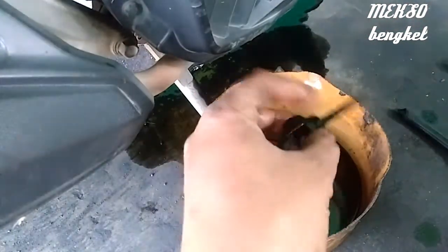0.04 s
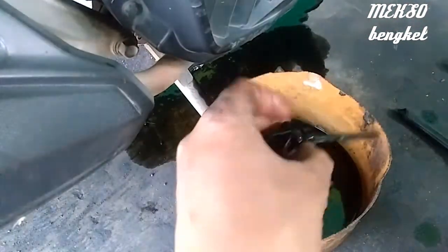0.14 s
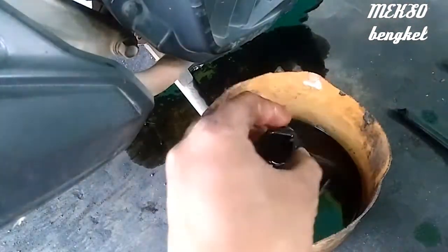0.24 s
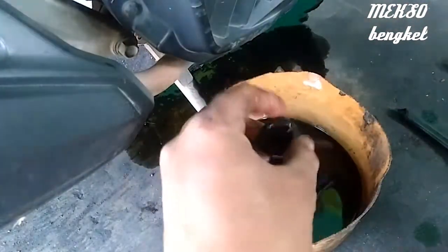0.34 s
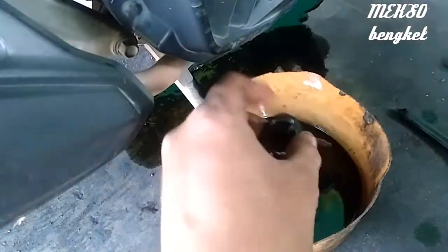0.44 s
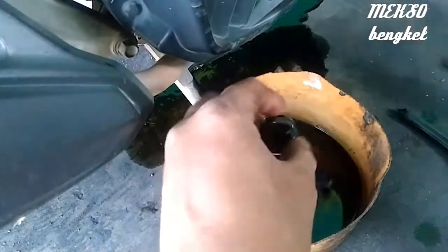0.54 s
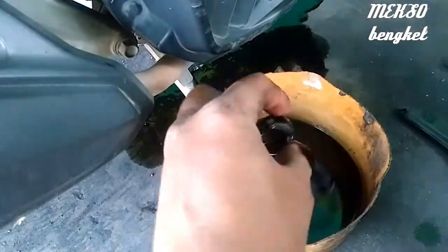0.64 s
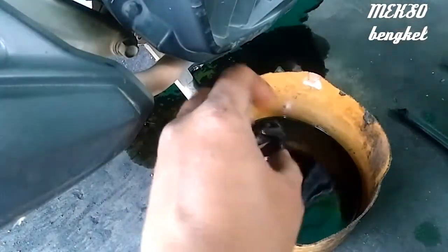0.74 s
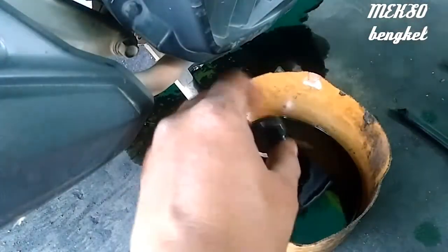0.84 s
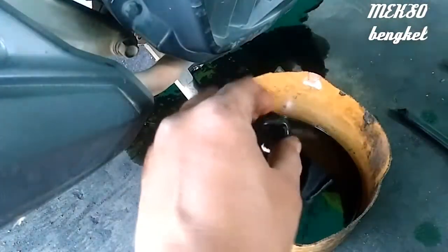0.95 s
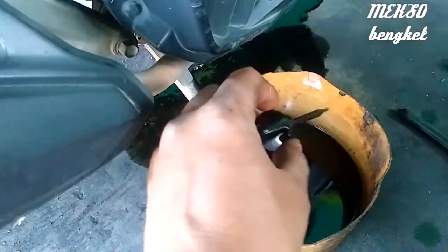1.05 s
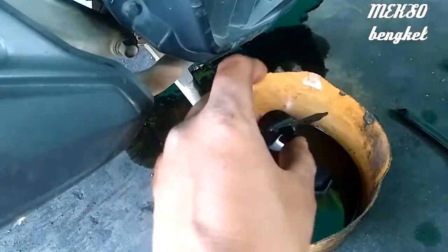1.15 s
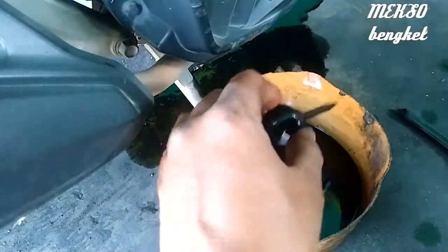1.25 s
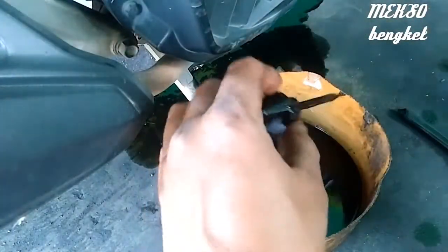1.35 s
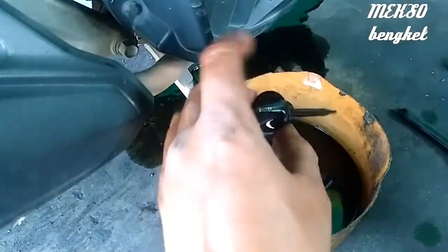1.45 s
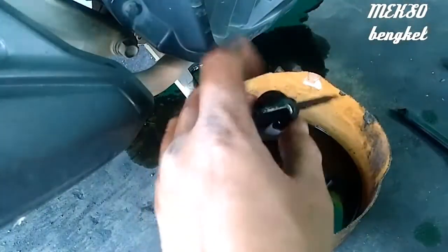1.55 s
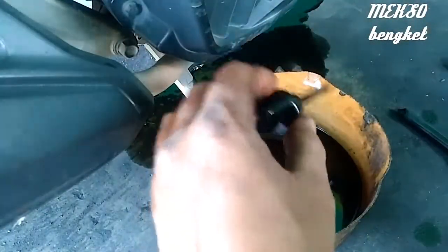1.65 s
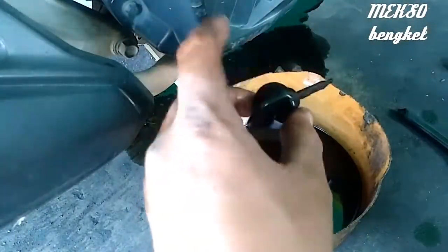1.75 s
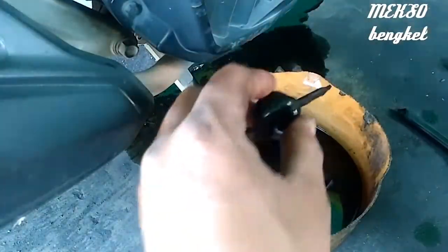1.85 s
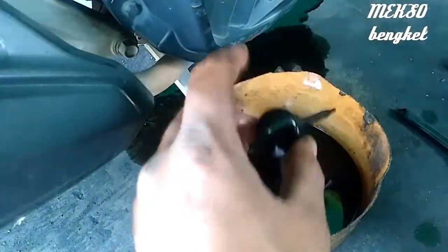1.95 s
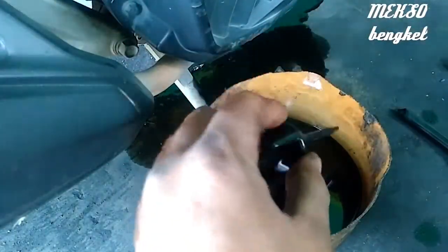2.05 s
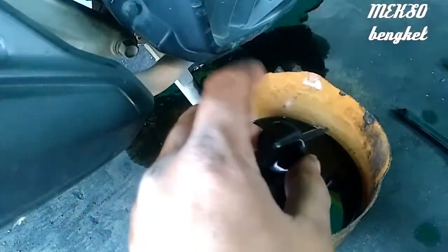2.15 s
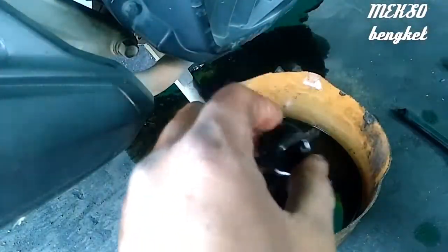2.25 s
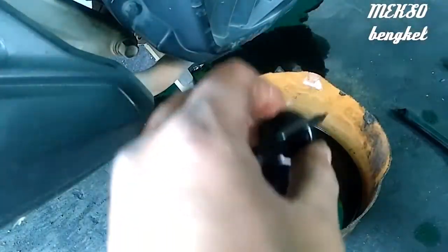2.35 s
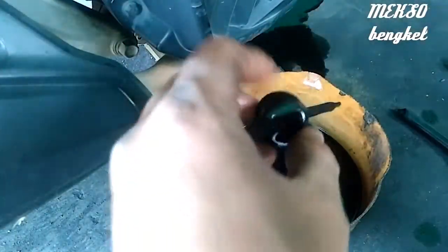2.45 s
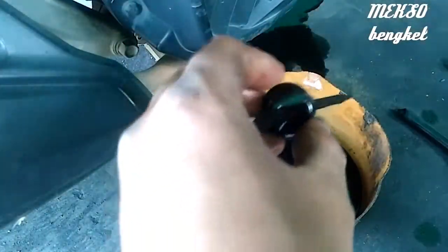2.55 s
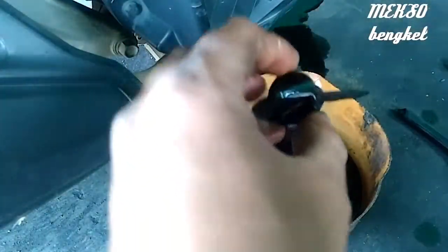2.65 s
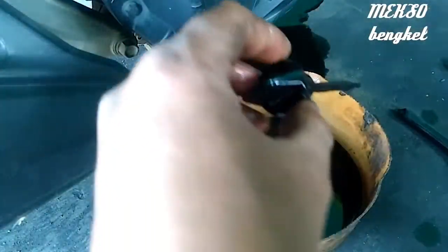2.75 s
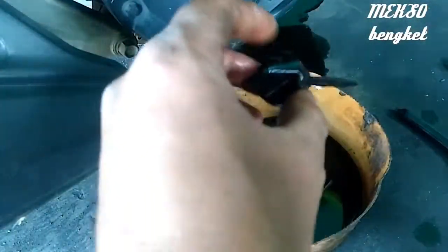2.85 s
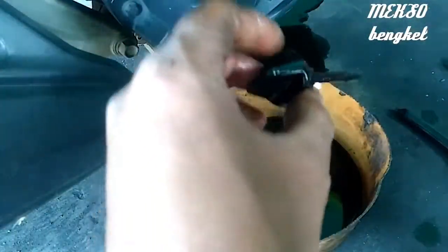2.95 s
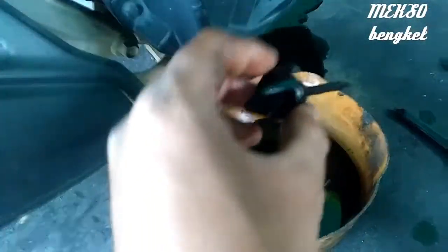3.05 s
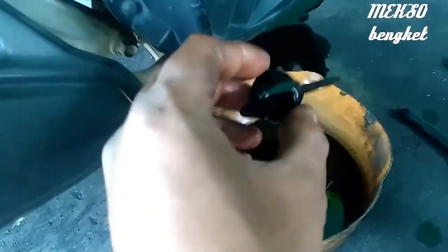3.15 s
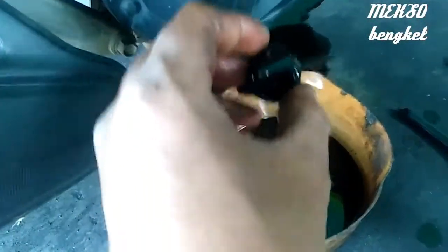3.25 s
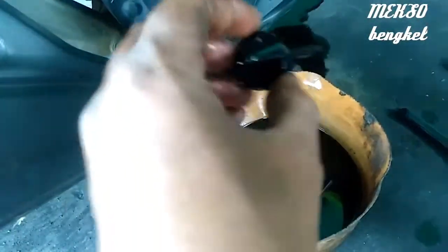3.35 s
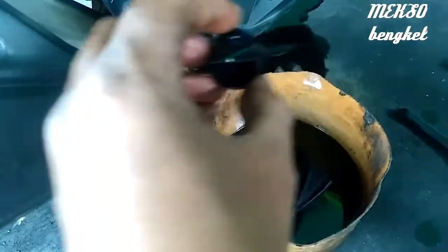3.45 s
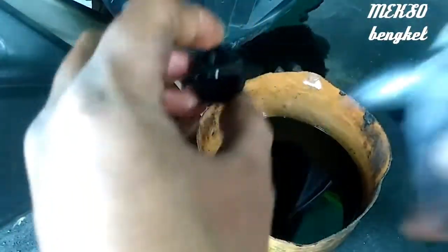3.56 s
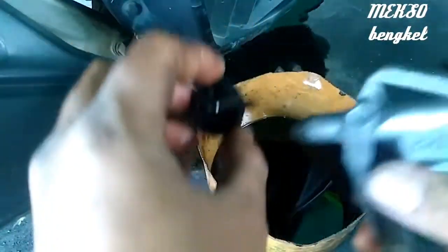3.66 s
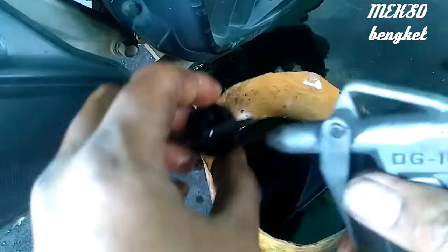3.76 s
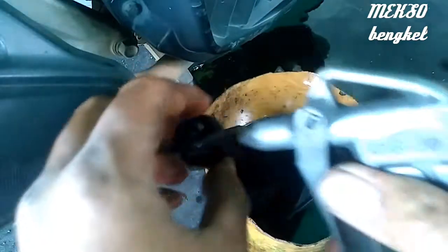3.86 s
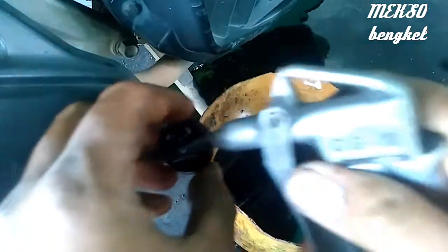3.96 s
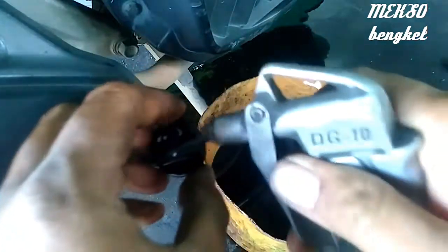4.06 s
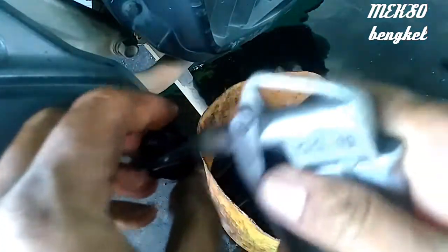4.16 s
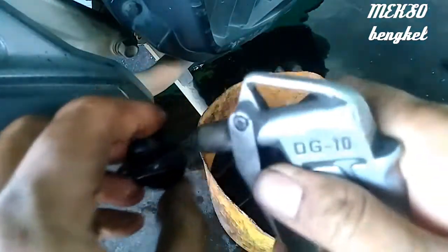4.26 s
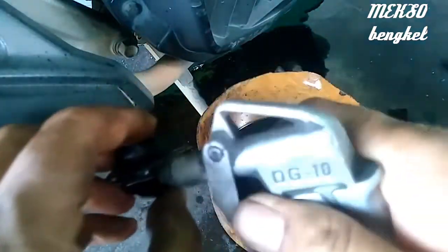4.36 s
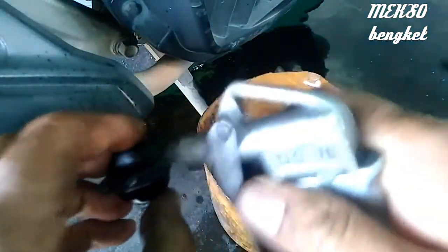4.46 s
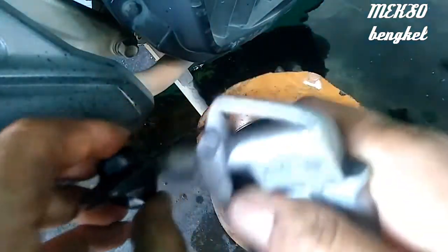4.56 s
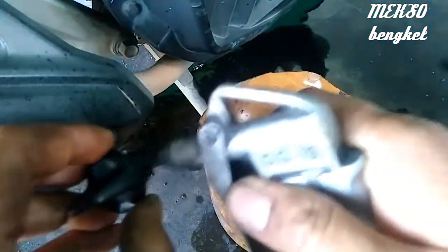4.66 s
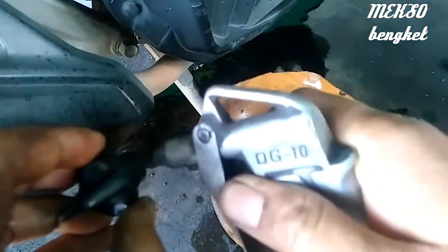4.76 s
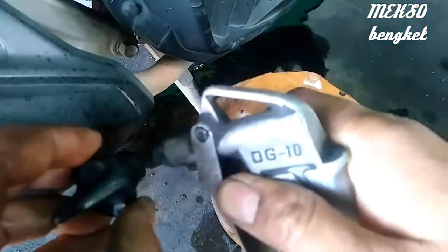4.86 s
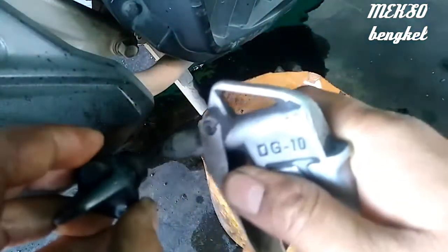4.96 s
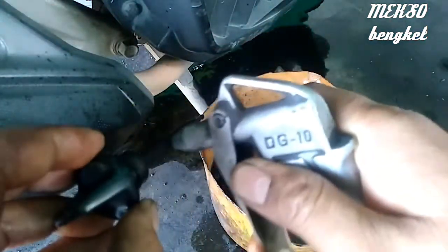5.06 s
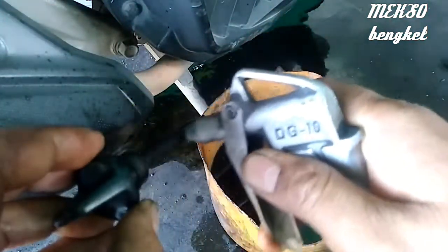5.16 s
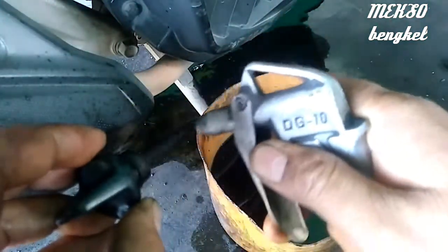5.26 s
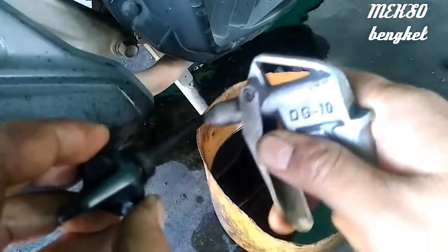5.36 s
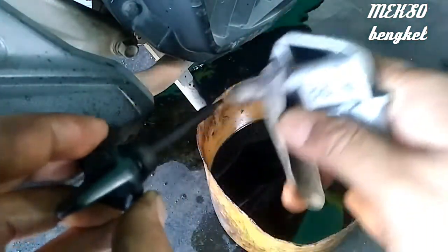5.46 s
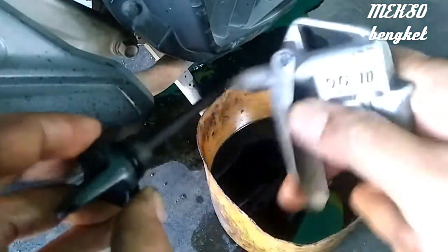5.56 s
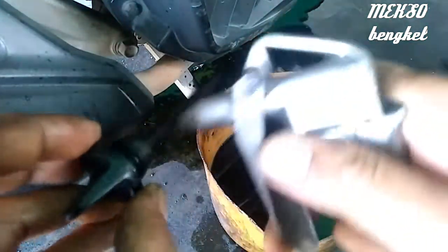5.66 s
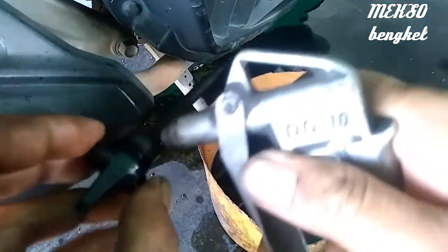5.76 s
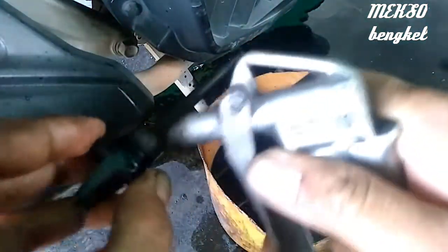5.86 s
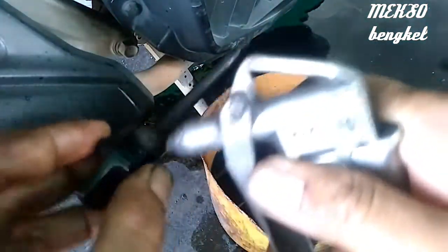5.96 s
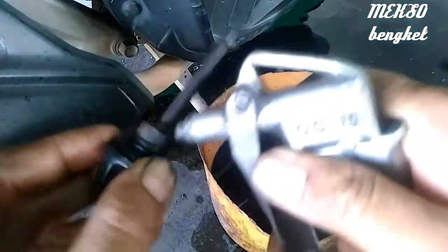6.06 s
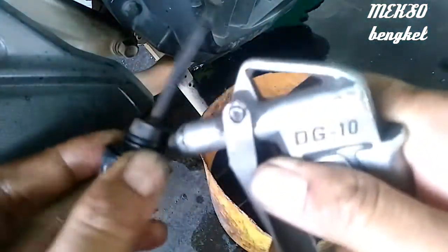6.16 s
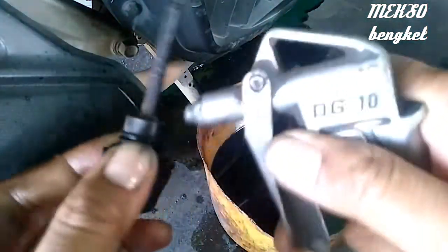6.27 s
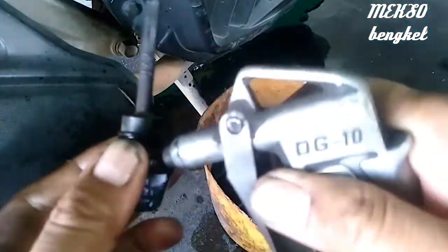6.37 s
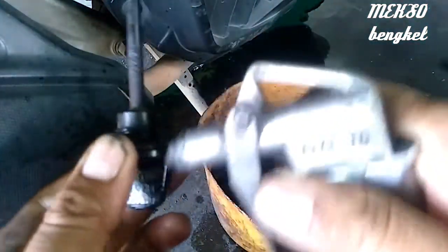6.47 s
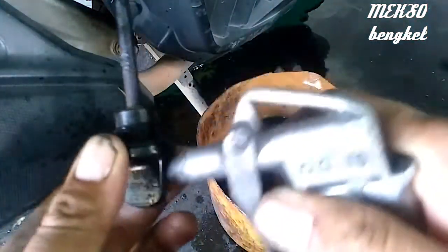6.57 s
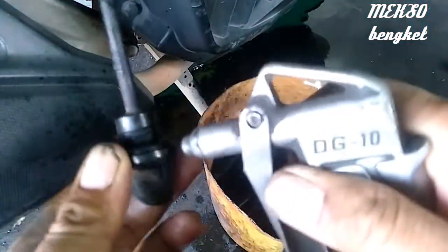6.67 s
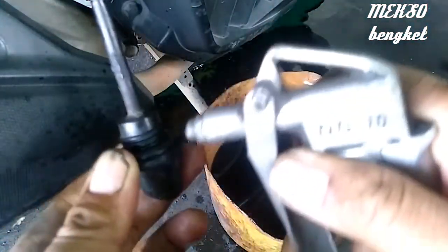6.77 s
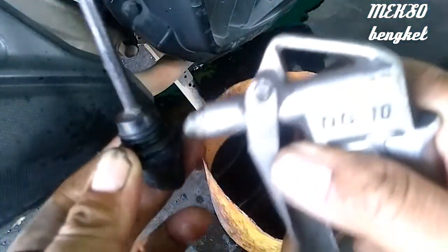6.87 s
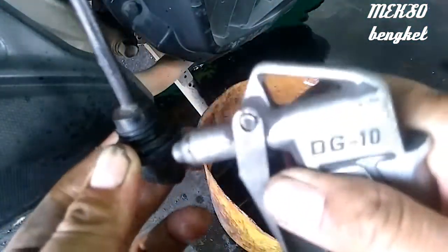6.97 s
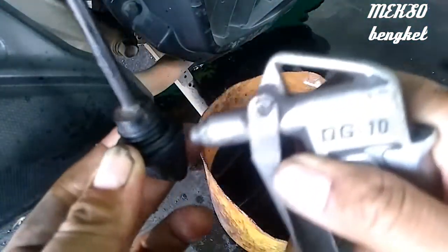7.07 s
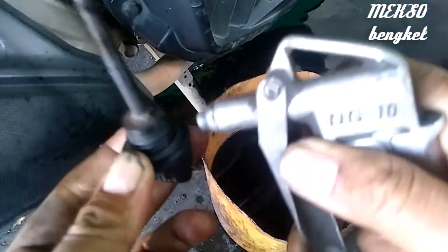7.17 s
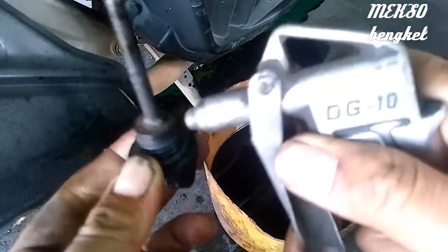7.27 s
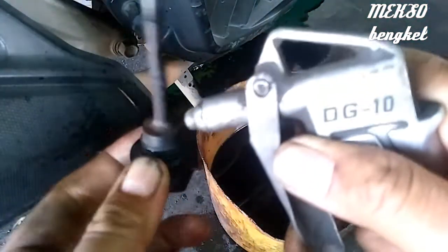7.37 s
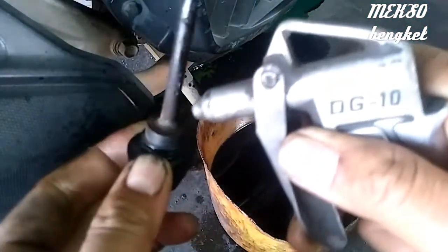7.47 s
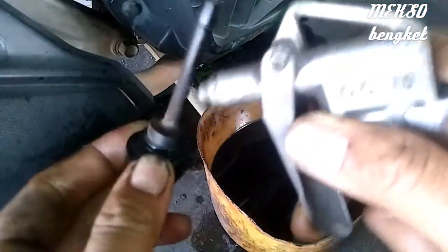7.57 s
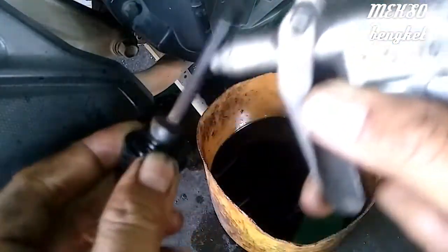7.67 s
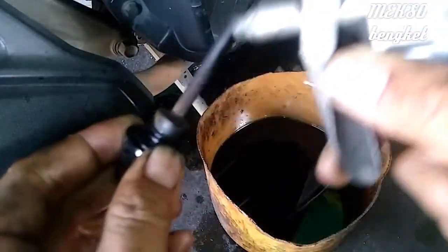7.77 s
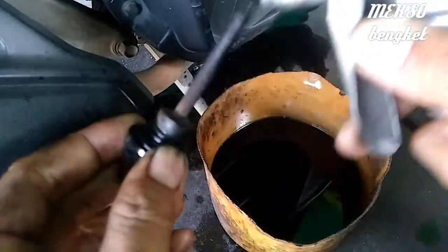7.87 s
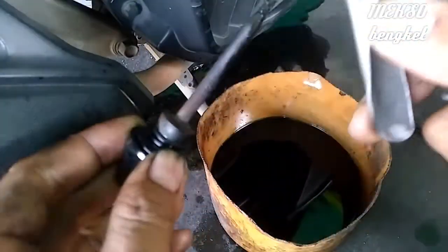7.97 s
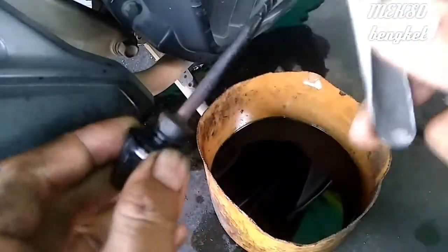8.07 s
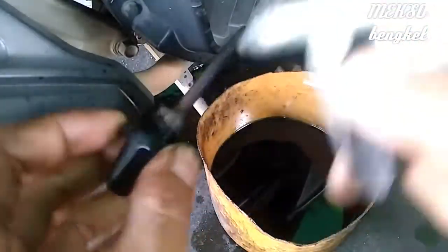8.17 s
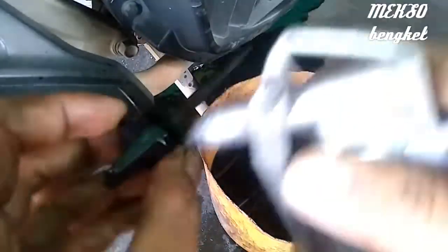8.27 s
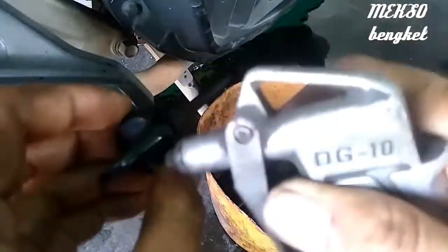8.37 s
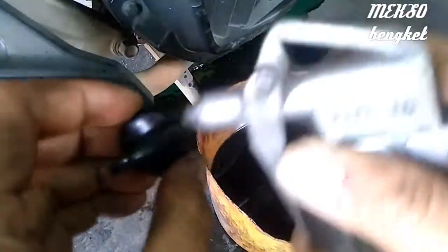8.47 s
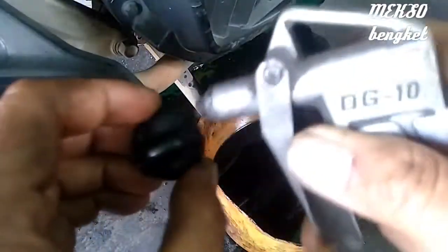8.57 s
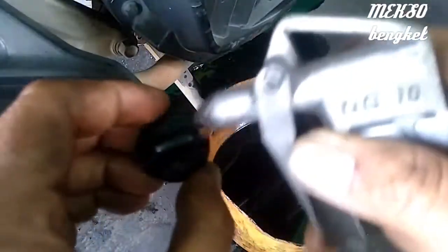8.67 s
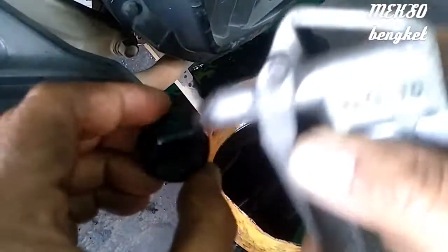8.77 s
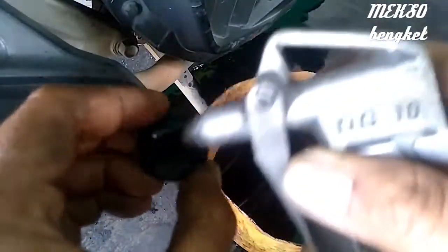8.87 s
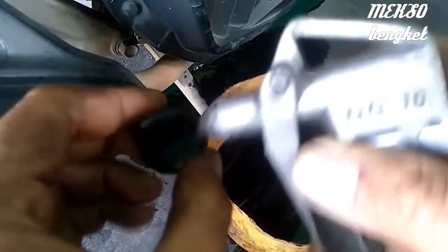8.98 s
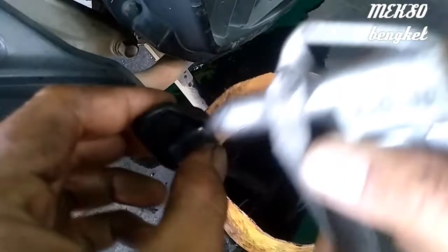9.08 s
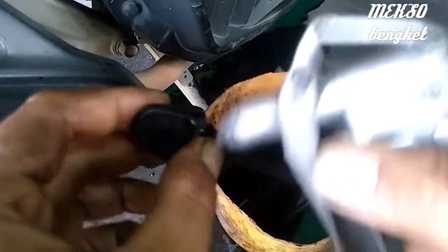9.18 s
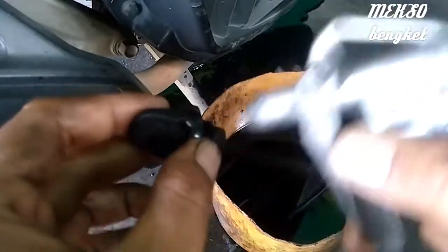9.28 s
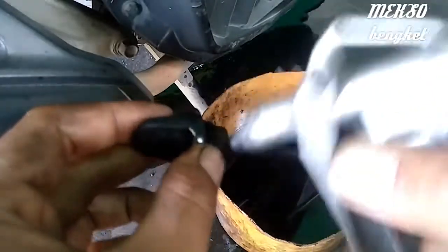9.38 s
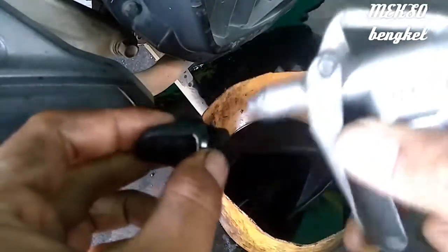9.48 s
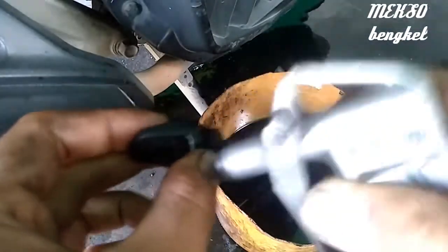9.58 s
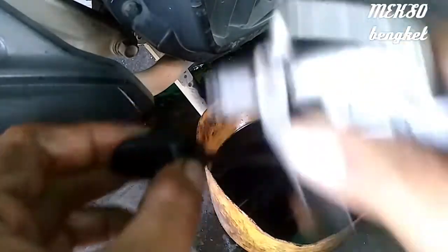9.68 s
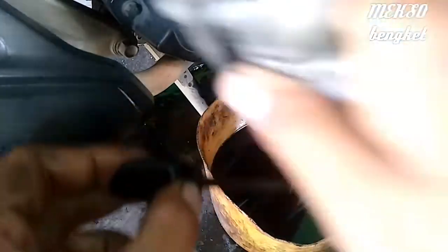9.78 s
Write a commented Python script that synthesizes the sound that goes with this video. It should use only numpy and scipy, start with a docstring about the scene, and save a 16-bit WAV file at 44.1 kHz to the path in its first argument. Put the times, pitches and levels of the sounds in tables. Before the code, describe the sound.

In an open workshop, a dipstick knocks twice on a plastic tub and a hollow panel thuds. Fingers rub the stick softly, a small bird chirps faintly and an engine outside hums nearer. Then a compressed-air blow gun fires three long, loud blasts with barely a gap between them. The jet hisses, roars and lightly whistles on the stick, close enough to overload the microphone.

```python
"""In an open workshop, an oily dipstick is cleaned with a compressed-air blow gun.
The stick knocks twice on a plastic tub and a hollow panel thuds, each ringing in its damped modes.
Fingers rub the stick, a small bird chirps and an engine outside draws nearer, slowing.
Then come three long blasts: the turbulent jet hisses, roars and whistles on the edge of the stick,
close enough to overload the microphone."""
import sys
import numpy as np
from scipy import signal
from scipy.fft import rfft, irfft, next_fast_len
from scipy.io import wavfile
from scipy.ndimage import uniform_filter1d

SR = 44100
rng = np.random.default_rng(int(sys.argv[2]) if len(sys.argv) > 2 else 0)


def persist_wave(psi):
    """Save psi, clipped to +-1, as 16-bit WAV."""
    counts = np.round(np.clip(psi, -1, 1) * 32767).astype(np.int16)
    wavfile.write(sys.argv[1], SR, np.atleast_2d(counts).T)


N = 433062
TIME = np.arange(N) / SR

# Treble peak of the jet's hiss and the knocks' snap. Each row: frequency in Hz, spectral level in dB.
HISS_SPECTRUM = [(4000, -26.5), (6000, -17), (7300, -12.5), (8250, -4), (8750, -2), (9050, -2.5),
                 (9550, -3.5), (10500, -9.5), (11500, -14.5), (13000, -21)]


def from_db(db):
    """Amplitude grows tenfold for every 20 dB."""
    return np.exp(np.asarray(db) * (np.log(10) / 20))


def rms_one(x):
    """Normalisation to unit mean power."""
    return x / np.sqrt(np.mean(x ** 2) + 1e-20)


def in_time(rows):
    """Linear interpolation of each column between the times in the first."""
    times, *columns = np.transpose(rows)
    return [np.interp(TIME, times, column) for column in columns]


def gain_curve(rows):
    """A gain that moves linearly in decibels between given times."""
    return from_db(in_time(rows)[0])


def spectral_gain(spectrum, size):
    """Gain at each FFT bin, interpolated in decibels over log frequency."""
    hz, db = np.transpose(spectrum)
    bin_hz = np.fft.rfftfreq(size, 1 / SR)
    return from_db(np.interp(np.log(bin_hz + 1), np.log(hz), db))


def drift(rate_hz):
    """Low-passed noise: a random wander of about unit rms."""
    step, settling = 40, 2000
    pole = np.exp(-2 * np.pi * step * rate_hz / SR)
    white = rng.standard_normal(N // step + settling + 2)
    slow = signal.lfilter([1], [1, -2 * pole, pole * pole], white)[settling:]
    return np.interp(np.arange(N) / step, np.arange(len(slow)), rms_one(slow))


def noise(spectrum, side_db=-4, count=N):
    """Spectrally shaped stereo noise whose mid signal has unit rms."""
    size = next_fast_len(count, True)
    white = rng.standard_normal((2, size))
    mid, side = irfft(rfft(white) * spectral_gain(spectrum, size), size)[:, :count]
    return (mid + from_db(side_db) * side * [[1], [-1]]) / mid.std()


def swells(rows):
    """Gaussian envelopes; the width of each is its standard deviation."""
    out = np.zeros(N)
    for centre, width, db in rows:
        near = np.abs(TIME - centre) < 5 * width
        out[near] += from_db(db) * np.exp(-((TIME[near] - centre) / width) ** 2 / 2)
    return out


def gate(spans, rise_db_per_s, fall_db_per_s):
    """Unit gain within each span, with exponential growth before it and decay after it."""
    below_db = [np.maximum(rise_db_per_s * (start - TIME), fall_db_per_s * (TIME - end))
                for start, end in spans]
    return from_db(-np.clip(np.min(below_db, axis=0), 0, 200))


def impulses(times, levels_db):
    """Brief excitations, idealised as one sample each."""
    out = np.full(N, 1e-18)
    out[np.round(np.asarray(times) * SR).astype(int)] += from_db(levels_db)
    return out


def ring(force, modes):
    """Modal superposition: a struck body answers with damped sines, here of alternating sign."""
    out = 0
    for k, (hz, db, t60) in enumerate(modes):
        radius, angle = from_db(-60 / (t60 * SR)), 2 * np.pi * hz / SR
        mode = signal.lfilter([0, np.sin(angle)], [1, -2 * radius * np.cos(angle), radius ** 2], force)
        out = out + (-1) ** k * from_db(db) * mode
    return out


def fade(force, t60):
    """Exponential decay: the envelope jumps at each impulse and loses 60 dB in t60 seconds."""
    return signal.lfilter([1], [1, -from_db(-60 / (t60 * SR))], force)


def workshop(x, wet_db, t60):
    """Reverberation: floor and walls add a diffuse, decaying tail to the direct sound."""
    # The reflections. Each row: frequency in Hz, spectral level in dB.
    room_spectrum = [(30, -4), (100, 11), (300, -7.5), (650, 0), (1100, 7), (1600, 3), (2300, 3), (3200, 1),
                     (7000, -7), (13000, -2)]
    delay = TIME[:SR]
    tail = noise(room_spectrum, count=SR) * from_db(-60 * delay / t60) * (delay > .004)
    tail = tail / np.sqrt(np.sum(tail ** 2) / 2)
    return x + from_db(wet_db) * signal.fftconvolve(np.atleast_2d(x), tail, axes=1)[:, :N]


def eddies(x, depth_db, life_s, width_hz=340):
    """Turbulent modulation: passing eddies make narrow bands swell and fade independently."""
    size = 256
    spectra = signal.stft(x, nperseg=size)[2]
    field = rng.standard_normal(spectra.shape[1:])
    span_bins, span_frames = width_hz * size / SR, 2 * life_s * SR / size
    for axis, span in 2 * [(0, span_bins), (1, span_frames)]:
        field = uniform_filter1d(field, max(1, round(span)), axis=axis)
    gain = rms_one(from_db(depth_db * rms_one(field)))
    return signal.istft(spectra * gain, nperseg=size)[1][:, :N]


def background(shop_db=-48, rumble_db=-47, leak_db=2.5):
    """Ambient noise: workshop air, street rumble and a faint wavering hiss add incoherently."""
    # The three noises. Each row: frequency in Hz, spectral level in dB.
    shop_spectrum = [(25, -28), (75, -3), (120, 0), (300, -18.5), (450, -15.5), (600, -22), (1500, -23),
                     (2100, -31), (2800, -30), (4200, -38), (5600, -42), (9000, -43), (13000, -58)]
    rumble_spectrum = [(30, -38), (55, -11), (76, 2), (100, -14.5), (170, -16.5), (400, -36), (2000, -78)]
    leak_spectrum = [(300, -14), (1500, -2.5), (4000, -4.5), (6500, -8), (8000, -2.5), (9000, 3.5),
                     (10500, -7), (13000, -17)]
    # The faint hiss. Each row: time in seconds, relative level in dB.
    leak_levels = [(.46, -49), (.66, -61), (.92, -41), (1.06, -56), (1.75, -62.5), (2.45, -56), (3.1, -53),
                   (3.9, -50.5)]
    # Surges of the street rumble. Each row: centre in seconds, width in seconds, level in dB.
    surges = [(.45, 0.066, -41), (1.84, .03, -50), (2.17, 0.024, -43)]
    leak = noise(leak_spectrum) * gain_curve(leak_levels) * from_db(leak_db + 1.9 * drift(5.2))
    leak = eddies(leak, depth_db=2.8, life_s=.04)
    rumble = (from_db(rumble_db) + swells(surges)) * noise(rumble_spectrum)
    return from_db(shop_db) * noise(shop_spectrum) + rumble + leak


def engine(rate_wander=0.0061, waver_db=2.5):
    """Periodic firing gives a harmonic series, which wavers with distance over broad road noise."""
    # The drive. Each row: time in seconds, firing rate in Hz, exhaust level in dB, road level in dB.
    drive = [(0, 30.6, -53, -57), (1.5, 32, -52.5, -69), (2.05, 32.5, -51, -56), (2.25, 31.5, -45.5, -54),
             (3.0, 31.2, -43.5, -47.5), (3.4, 31, -37, -45.5), (3.85, 31, -37, -42.5),
             (5.7, 30.8, -37.5, -38.5), (9.8, 20, -46, -54)]
    # Exhaust harmonics. Each row: multiple of the firing rate, relative level in dB.
    harmonics = [(2, -5.5), (3, -6.5), (4, 0.5), (5, -8.5), (6, -5.5), (7, -5.5), (8, -13.5), (9, -7),
                 (10, -9.5), (11, -22), (14, -17)]
    firing_hz, exhaust_db, road_db = in_time(drive)
    phase = 2 * np.pi * np.cumsum(firing_hz * (1 + rate_wander * drift(5.45))) / SR
    exhaust = 0
    for k, db in harmonics:
        exhaust += from_db(db + waver_db * drift(4.5)) * np.sin(k * phase + 2 * np.pi * rng.random())
    # Road noise. Each row: frequency in Hz, spectral level in dB.
    road_spectrum = [(60, -20), (130, -1), (250, 2), (450, -4), (1400, -9), (2800, -16), (5500, -35),
                     (9000, -45)]
    return from_db(exhaust_db) * rms_one(exhaust) + from_db(road_db) * noise(road_spectrum)


def thuds():
    """Soft blows, the strongest with a rebound, excite the low modes of a hollow panel."""
    # The blows. Each row: start in seconds, relative level in dB.
    blows = [(0.0142, -24), (0.52, -28), (0.9164, 0.5), (0.9212, -2), (0.9466, -7), (.961, -9.5)]
    # The panel's resonances. Each row: frequency in Hz, gain in dB, 60 dB decay time in seconds.
    panel_modes = [(112, -20, 0.31), (210, -19.5, 0.13), (237, -14.5, 0.066), (315, -10, 0.11),
                   (382, -24, 0.11), (435, -20, 0.1), (524, -22, 0.09), (644, -34, 0.087), (913, -35, 0.05)]
    return workshop(ring(impulses(*np.transpose(blows)), panel_modes), wet_db=-4.5, t60=0.33)


def knocks(crack_db=-5, snap_db=-16):
    """Impact excitation: a hard contact gives a broadband crack, then tub and stick ring freely."""
    # Knocks and ticks. Each row: start in seconds, level in dB, offsets in dB for snap, tub and stick.
    contacts = [(.032, -3.5, -20, 2, -17), (0.033, -20, -14, -1.5, -18), (0.5194, -7.5, -6, -24, -12),
                (1.197, -34, 2, -25, -11), (1.8857, -29, 1, -4, -4), (3.088, -41, 20, -30, -14),
                (3.297, -40, 10, -30, -12), (3.8524, -30, 2, -6, -8)]
    # The crack of a contact. Each row: frequency in Hz, spectral level in dB.
    crack_spectrum = [(100, -22), (400, -1), (1500, 5.5), (3000, 1), (5000, 2), (7000, -7.5), (9000, -1.5),
                      (13000, -33)]
    # The two bodies' resonances. Each row: frequency in Hz, gain in dB, 60 dB decay time in seconds.
    tub_modes = [(468, -20, 0.057), (940, -14, 0.044), (1053, -18, 0.055), (1125, -20.5, 0.11),
                 (1365, -6, 0.023), (1550, -16, 0.068), (1810, -17, 0.028), (1895, -18, 0.039),
                 (2060, -17, .04), (2390, -10, 0.037), (4200, -9, .02)]
    stick_modes = [(970, -6, 0.029), (1720, -23, 0.032), (2590, -3, 0.037), (3120, -2, 0.027),
                   (3230, -31, 0.018), (4530, -55, .015), (5300, -42, .012)]
    starts, level_db, lift_db, tub_db, stick_db = np.transpose(contacts)
    crack = from_db(crack_db) * noise(crack_spectrum) * fade(impulses(starts, level_db), t60=0.024)
    snap = from_db(snap_db) * noise(HISS_SPECTRUM) * fade(impulses(starts, level_db + lift_db), t60=0.09)
    tub = ring(impulses(starts, level_db + tub_db), tub_modes)
    stick = ring(impulses(starts, level_db + stick_db), stick_modes)
    return workshop(crack + snap + tub + stick, wet_db=-10.5, t60=0.34)


def rubs(grain_db=2.5, skirt_db=-14):
    """Sliding friction between fingers and stick gives short, grainy swishes of band noise."""
    # The strokes. Each row: centre in seconds, width in seconds, level in dB, peak frequency in Hz.
    strokes = [(0.558, 0.056, -45.5, 8000), (0.927, 0.0086, -30.5, 1000), (.925, 0.012, -41, 5050),
               (0.954, 0.027, -43, 2400), (1.31, 0.024, -52.5, 3600), (1.665, .012, -50, 3000),
               (2.803, 0.029, -53, 7000), (3.082, .025, -50, 8000), (3.87, .02, -51, 1690)]
    out = np.zeros((2, N))
    for centre, width, db, hz in strokes:
        spectrum = [(hz / 10, 2 * skirt_db), (hz / 2, skirt_db / 2), (hz, 0),
                    (hz * 2, skirt_db), (hz * 10, 3 * skirt_db)]
        envelope = swells([(centre, width, db)])
        during = np.flatnonzero(envelope)
        out[:, during] += envelope[during] * noise(spectrum, count=len(during))
    return out * from_db(grain_db * drift(150))


def bird(rasp=0.053, waver=0.018):
    """Frequency modulation: raspy arching chirps and thin whistles, heard mostly by reflection."""
    # One chirp. Each row: time from its start in seconds, frequency in Hz, relative level in dB.
    contour = [(0, 4040, -21), (.01, 4150, 12.5), (.02, 4890, 7.5), (.028, 4300, 9), (.045, 3400, 1),
               (.06, 3000, -26)]
    # Its repeats. Each row: start in seconds, relative level in dB.
    chirps = [(1.565, -55), (2.19, -50.5), (2.405, -63), (2.862, -52), (3.724, -53)]
    # Distant whistles. Each row: start and length in seconds, first and last pitch in Hz, level in dB.
    whistles = [(1.272, .3, 2260, 2350, -61), (1.35, 0.24, 2700, 2700, -62), (1.597, .18, 3430, 3520, -59),
                (1.66, 0.2, 2776, 2920, -59), (1.814, .37, 4780, 4520, -57)]
    hz, contour_db = in_time(contour)
    phase = 2 * np.pi * np.cumsum(hz * (1 + rasp * drift(400))) / SR
    chirp = (from_db(contour_db) * np.sin(phase))[:int(contour[-1][0] * SR)]
    calls = signal.fftconvolve(impulses(*np.transpose(chirps)), chirp)[:N]
    for start, length, first_hz, last_hz, db in whistles:
        progress = np.clip((TIME - start) / length, 0, 1)
        hz = (first_hz + (last_hz - first_hz) * progress) * (1 + waver * drift(150))
        envelope = from_db(db) * np.sqrt(np.abs(np.sin(np.pi * progress)))
        calls += envelope * np.sin(2 * np.pi * np.cumsum(hz) / SR)
    return workshop(from_db(-3.5) * calls, wet_db=1, t60=.35)


def valve(hiss_hold_s=0.0013, roar_delay_s=0.0096, spurt_s=0.01, spurt_db=-11.5, echo_t60=0.71):
    """Flow sets two gains: hiss at any opening, roar only at full flow, so later and more briefly."""
    # The trigger. Each row: full squeeze in seconds, release in seconds, relative hiss level in dB.
    blasts = [(3.949, 5.629, -10.5), (5.782, 8.435, -11), (8.508, 9.9, -10.2)]
    hiss_rise, hiss_fall, roar_rise, roar_fall = 2100, 244, 1100, 600  # dB per second
    hisses = [from_db(db) * gate([(start, end + hiss_hold_s)], hiss_rise, hiss_fall)
              for start, end, db in blasts]
    # Between the last two blasts the valve never quite shuts.
    seeping = from_db(-16) * gate([(8.44, 8.50)], hiss_rise, hiss_fall)
    # Pressure stored in the hose makes the hiss overshoot as the valve opens.
    overshoot = 1 + swells([(start, spurt_s, spurt_db) for start, _, _ in blasts])
    full_flow = [(start + roar_delay_s, end) for start, end, _ in blasts]
    direct = gate(full_flow, roar_rise, roar_fall)
    echo = from_db(-17) * gate(full_flow, roar_rise, 60 / echo_t60)  # lingers in the workshop
    return overshoot * np.max(hisses + [seeping], axis=0), np.maximum(direct, echo)


def blow_gun(roar_db=5.5, hiss_db=1.72, grazing_db=-23):
    """A turbulent jet radiates a broad roar, a narrow hiss and, where it meets the stick, an edge tone."""
    # Roar and edge tone. Each row: frequency in Hz, spectral level in dB.
    roar_spectrum = [(20, -28), (45, -11), (80, -5), (140, -2.5), (500, -1), (1500, -1), (3900, .5),
                     (5200, -2), (9000, -7.5), (13000, -2)]
    edge_spectrum = [(4500, -20), (5900, 1.5), (6500, 4), (7600, 12), (8400, 0), (10000, -30)]
    # The roar as the gun is moved about. Each row: time in seconds, relative level in dB.
    roar_levels = [(3.97, -19.5), (4.25, -18), (4.65, -18), (5.0, -18.5), (5.55, -21), (5.82, -18),
                   (6.4, -18.9), (7.3, -18.5), (7.7, -18), (8.2, -20.5), (8.5, -18), (9.35, -19.5),
                   (9.8, -18.9)]
    # The jet hits the stick squarely and flares, or crosses its edge and whistles.
    # Each row: centre in seconds, width in seconds, relative level of the added part in dB.
    flares = [(4.28, 0.034, -12), (4.385, 0.014, -13), (5.265, 0.024, -6), (5.46, 0.022, -14),
              (5.82, 0.018, -19), (6.42, .02, -8), (6.64, .025, -12), (6.82, .08, -13), (8.73, .03, -14),
              (8.885, 0.0084, -8), (9.08, .025, -14), (9.75, .015, -13)]
    crossings = [(4.62, 0.047, -17.5), (6.46, 0.12, -23), (6.68, 0.042, -26), (7.0, .07, -21),
                 (7.25, 0.054, -17.5), (7.3, 0.17, -23), (8.0, .2, -22), (8.33, .06, -22), (9.3, .15, -24)]
    hiss_gain, roar_gain = valve()
    roar = noise(roar_spectrum, side_db=-1.5) * gain_curve(roar_levels)
    roar *= from_db(roar_db + 0.6 * drift(27))
    hiss = noise(HISS_SPECTRUM, side_db=-1.9) * (1 + swells(flares))
    hiss *= from_db(hiss_db + 1.27 * drift(20.04))
    edge = noise(edge_spectrum, side_db=-2.5) * (from_db(grazing_db) + swells(crossings))
    edge *= from_db(2.5 * drift(9.1))
    # The hiss half whistles as it flickers; the roar stays smoother.
    whistling = eddies(hiss_gain * hiss + roar_gain * edge, depth_db=2.4, life_s=.026)
    rushing = roar_gain * eddies(roar, depth_db=1.3, life_s=.026)
    return whistling + rushing


def puff(peak_s=8.428, level_db=-20):
    """Wind noise: one puff of air buffets the microphone with low-frequency pressure swings."""
    envelope = from_db(level_db) * gate([(peak_s, peak_s)], rise_db_per_s=2000, fall_db_per_s=550)
    return envelope * noise([(25, -6), (110, 1), (220, -11), (1000, -54)])


def narrow(x):
    """Mid-side filtering leaves the sound nearly mono below 4 kHz and wide in the high hiss."""
    # Stereo width. Each row: frequency in Hz, side gain in dB.
    width = [(2500, -55), (3800, -74), (4400, -4.5), (6000, -0.5)]
    mid, side = (x[0] + x[1]) / 2, (x[0] - x[1]) / 2
    size = next_fast_len(N, True)
    side = irfft(rfft(side, size) * spectral_gain(width, size), size)[:N]
    return mid + side * [[1], [-1]]


def low_pass(x, hz):
    """A windowed-sinc filter cuts the treble very steeply."""
    kernel = signal.firwin(601, hz, fs=SR, window="blackman")
    return signal.fftconvolve(x, kernel[None], "same", axes=1)


def scene():
    """Superposition: the pressures of all sources add at the microphone."""
    return blow_gun() + puff() + knocks() + rubs() + thuds() + engine() + bird() + background()


def record(dry, ceiling=1.196, band_hz=13100, cutoff_hz=15800):
    """Clipping distorts the loudest hiss; the treble ends steeply at 13 kHz, with faint fizz above."""
    overloaded = narrow(np.clip(dry, -ceiling, ceiling))
    band_limited = low_pass(overloaded, band_hz)
    return low_pass(np.clip(band_limited, -1, 1), cutoff_hz)


dry = scene()
out = record(dry)
persist_wave(out)
```